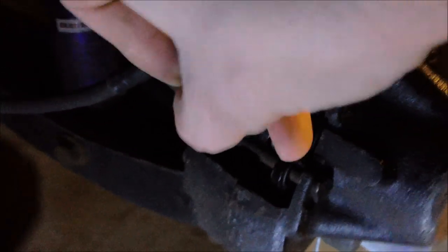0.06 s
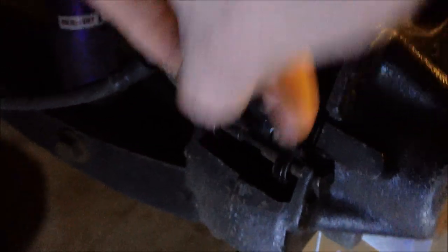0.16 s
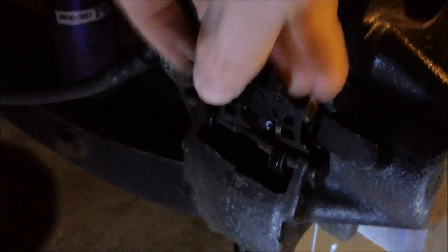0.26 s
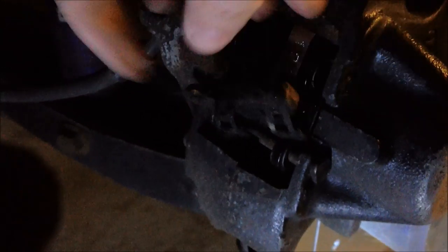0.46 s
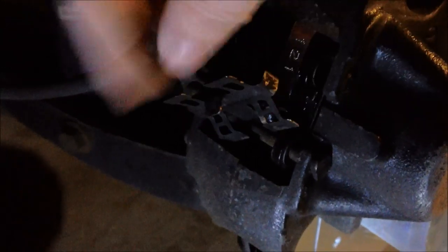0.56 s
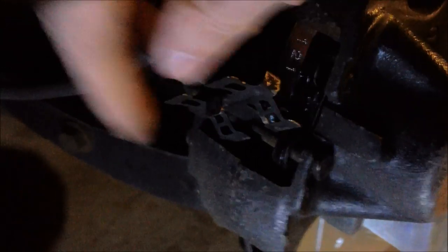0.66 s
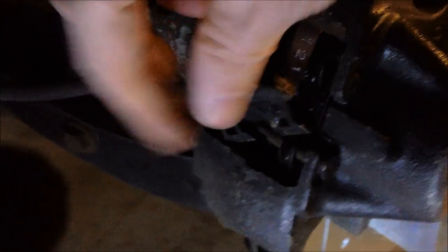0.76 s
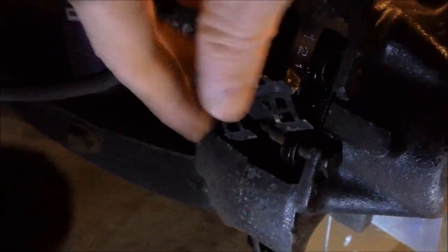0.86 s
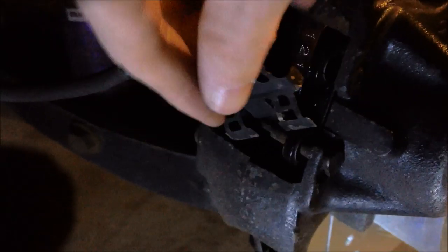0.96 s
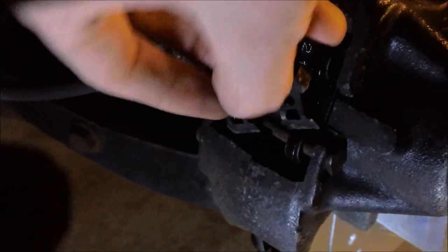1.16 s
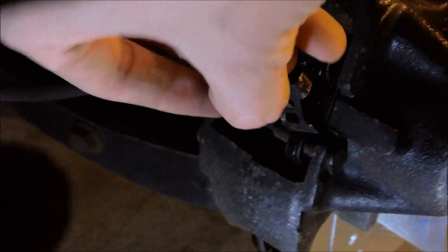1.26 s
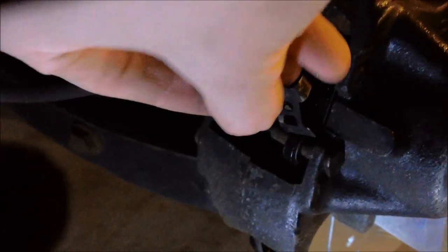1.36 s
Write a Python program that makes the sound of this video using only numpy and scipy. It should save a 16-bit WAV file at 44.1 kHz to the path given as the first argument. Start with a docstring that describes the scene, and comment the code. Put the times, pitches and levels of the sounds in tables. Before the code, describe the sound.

A steel spring clip snaps with one sharp tick, then scrapes and clicks against metal.

```python
"""Spring clip on a brake caliper

Close by in a quiet garage, a hand works a steel spring clip on the pad pin of a brake caliper.
The clip snaps off the pin with one hard, very bright tick, scrapes along, jingles as it comes free
and is set down again. Knocks ring the heavy caliper; in between, the steel rubs and faintly squeaks."""
import sys
import numpy as np
from scipy import signal
from scipy.fft import rfft, irfft
from scipy.io import wavfile
from scipy.ndimage import uniform_filter1d

SR = 44100
rng = np.random.default_rng(int(sys.argv[2]) if len(sys.argv) > 2 else 0)


def transcribe(u):
    """Save the signal u as a 16-bit wav file named by the first command-line argument.

    u: samples, shape (n,) or (channels, n), limited to [-1, 1]; the rate is SR.
    q: integer samples, one column per channel.
    """
    v = np.clip(np.atleast_2d(u).T, -1, 1)
    q = np.round(v * 32767).astype(np.int16)
    wavfile.write(sys.argv[1], SR, q)


N = 61739
TIME = np.arange(N) / SR
FREQS = np.maximum(np.fft.rfftfreq(N, 1 / SR), 1)

# Still garage air and microphone hiss. Each row: frequency in Hz, relative level in dB.
AIR_COLOUR = [(25, -10.5), (48, -5.5), (60, -6.5), (75, -16), (125, 6), (200, 2), (400, -7.5), (700, -9.5),
              (1200, -13.5), (2000, -13.5), (4000, -13), (9000, -17.5), (13000, -16), (15500, -16)]
RUB_FADER = [(0, -59.5), (.09, -59), (.2, -64.5), (.25, -61.5), (.3, -55.5), (.42, -56.5), (.47, -70),
             (.52, -56.5), (.6, -58), (.68, -63), (.76, -74.5), (.86, -71), (.97, -64.5), (1.06, -72.5),
             (1.12, -62.5), (1.21, -67), (1.3, -68.5), (1.4, -73.5)]
# The tone of the scrape. Each row: frequency in Hz, relative level in dB.
RUB_COLOUR = [(100, -27), (200, 0), (450, 1), (680, -2), (1000, 2.5), (1900, -3.5), (2700, -8), (4000, -12),
              (6000, -18.5), (9000, -22), (12500, -18.5), (15500, -18)]
# Steel singing for a moment. Each row: start in seconds, length in seconds, pitch in Hz, level in dB.
SQUEAKS = [(0.037, 0.021, 1220, -75), (0.364, 0.025, 11200, -56.5), (0.373, 0.039, 11800, -64.5),
           (0.401, 0.038, 874, -56.5), (0.496, 0.027, 479, -56.5), (.884, 0.0084, 1040, -44.5),
           (1.085, 0.011, 12900, -62.5), (1.086, 0.024, 14300, -62.5), (1.087, 0.045, 1005, -61.5)]
# Steel touching steel. Each row: start in seconds, levels of thud, clank, ring and sparkle in dB,
# chatter time in seconds.
CONTACTS = [ (0.064, -65, -54.5, -62.5, -62, 0.004), (0.136, -69, -58, -71, -68, 0.0026),
            (0.2408, -47, -38, -39, -26.5, 0.00071), (0.336, -68, -59, -82, -57.5, 0.0032),
            (.372, -70, -60, -65, -57.5, 0.0047), (0.41, -68.5, -61, -70, -66.5, 0.0048),
            (0.499, -64, -61, -75, -67.5, 0.0091), (0.5377, -57, -70, -58.5, -52.5, .0005),
            (0.565, -53.5, -49.5, -64, -52, 0.00063), (0.581, -70, -60, -61, -57, 0.0013),
            (0.59, -66.5, -57.5, -51, -51, 0.021), (0.871, -64, -64.5, -66, -68, 0.0025),
            (0.884, -53.5, -51, -65, -58, 0.0023), (0.892, -50, -50.5, -46, -50, 0.0012),
            (1.089, -67, -78.5, -84, -68, 0.0044), (1.118, -65.5, -61, -77, -81, 0.0057),
            (1.176, -68, -60.5, -66.5, -61.5, 0.001), (1.191, -73, -60, -85.5, -64.5, 0.0028),
            (1.23, -66.5, -74, -73, -64, .003), (1.265, -76.5, -64.5, -76, -78, 0.0023)]
# The thud, clank, ring and sparkle bands. Each row: low and high edge in Hz, 60 dB decay time in
# seconds, garage echo send in dB.
CONTACT_BANDS = [(171, 650, .07, -21), (881, 2050, .08, -40), (2564, 7000, 0.057, -17.5),
                 (9700, 17100, 0.04, -24.5)]
# The crowded modes of the whole assembly. Each row: frequency in Hz, relative level in dB.
ASSEMBLY_COLOUR = [(200, -7), (450, 2.5), (700, -6.5), (1100, -5.5), (1450, 5), (2000, 6), (2550, 7),
                   (3250, 3.5), (4400, 8.5), (5300, -1), (6400, 1.5), (7500, 5), (10000, 5.5), (12500, 10),
                   (13400, 6.5), (15000, 3)]
# Knocks that leave the parts ringing. Each row: start in seconds, place struck, then the force in dB
KNOCKS = [(.2415, "pin", -42, -87, -51.5), (.503, "pad", -56, -64.5, -76),
          (.5635, "pin", -55, -65.5, -58.5), (.591, "pin", -64, -47, -73), (0.605, "pad", -48.5, -60, -59),
          (.8912, "rim", -43, -63, -40.5), (1.188, "rim", -59, -89, -71)]
# Where a knock can land: pin, pad or rim.
PLACES = ["pin", "pad", "rim"]
# The tones of caliper and pad. Each row: pitch in Hz, 60 dB decay time in seconds, then the gain in dB
# when struck at the pin, at the pad and at the rim.
CALIPER_MODES = [(895, .43, -6, 0, -10), (1012, .1, -22, -18, -5), (1080, .2, -22, -14, -12),
                 (1250, .22, -15, -15, -1), (1405, .14, 0, -17, -11), (1785, .1, -1, -20, -1),
                 (2046, .2, -6, -16, -16), (3228, .12, -4, -16, -8), (3822, .18, -13, -25, -22)]
ARM_MODES = [(3100, -5, .12), (3230, -2, .13), (4350, 2, .11), (6896, -9, .15), (7803, 0, .09),
             (8371, -1, .15), (9242, 0, .09), (9658, -11, .15), (10544, -6, .16), (11312, -2, .16),
             (11640, -1, .15), (12385, -3, .22), (12760, -7, .16), (15222, -3, .13)]
SEAT_MODES = [(4330, -4, .04), (4470, -1, .045), (6896, -5, .06), (10600, -3, .075), (10930, -12, .1),
              (11680, -8, .07), (12410, -3, .055)]
# The tick, choked by the fingers. Each row: pitch in Hz, level in dB, 60 dB decay time in seconds.
SNAP_MODES = [(161.4, -47, .01), (1750, -46.5, .012), (3300, -31, 0.0088), (4180, -24.5, .007),
              (6350, -31, 0.0081), (9900, -49, .004), (11600, -22.5, .004), (12300, -15, 0.0037),
              (13700, -7, 0.009), (14100, -21, 0.0071), (15000, -21.5, .004)]

AIR_DB = -68
RUB_SLIPS_PER_S, SLIP_SPREAD_DB, RUB_HUM_DB = 2500, 1, -43.5
SQUEAK_WAVER_SHARE, WAVER_S = 0.03, 0.0006
GARAGE_T60_S, CONTACT_RISE_S = 0.32, 0.000521
SNAP_S, BOUNCE_AFTER_S, BOUNCE_DB = 0.2407, 0.001134, -9
LOW_CUT_HZ, TREBLE_EDGE_HZ, CUTOFF_HZ = 70, 15400, 16860


def from_db(db):
    """Decibels to gain."""
    return 10 ** (np.asarray(db) / 20)


def rms_one(x):
    """Scale to unit power."""
    return x / np.sqrt(np.mean(x ** 2) + 1e-20)


def coloured(x, colour):
    """EQ a steady sound with a colour curve and bring it to unit power."""
    hz, db = np.transpose(colour)
    eq = from_db(np.interp(np.log(FREQS), np.log(hz), db))
    return rms_one(irfft(rfft(x) * eq, N))


def clicks(times, db):
    """One impulse of force for each knock."""
    force = np.zeros(N)
    np.add.at(force, np.round(np.asarray(times) * SR).astype(int), from_db(db))
    return force


def ring(force, hz, t60):
    """One mode: a unit click starts a dying tone of height 1, with no rumble under it."""
    radius, angle = from_db(-60 / (t60 * SR)), 2 * np.pi * hz / SR
    return signal.lfilter([.5, 0, -.5], [1, -2 * radius * np.cos(angle), radius ** 2], force + 1e-18)


def body(force, modes):
    """All the modes of one part under one force, in alternating polarity."""
    return sum((-1) ** k * from_db(db) * ring(force, hz, t60) for k, (hz, db, t60) in enumerate(modes))


def dying(age, t60):
    """Hold at 1 until age zero, then fall 60 dB every t60 seconds."""
    return np.exp(-np.log(1000) * np.maximum(age, 0) / t60)


def garage_air():
    """The bed: soft, steady room tone and hiss."""
    return from_db(AIR_DB) * coloured(rng.standard_normal(N), AIR_COLOUR)


def rubbing():
    """Dense tiny slips of steel on the rough iron rim make a scrape and keep the caliper humming."""
    slip_db = SLIP_SPREAD_DB * np.minimum(rng.exponential(1, N), 4)
    sizes = from_db(slip_db) * rng.choice([-1, 1], N)
    slips = sizes * (rng.random(N) < RUB_SLIPS_PER_S / SR)
    fader = from_db(np.interp(TIME, *np.transpose(RUB_FADER)))
    scrape = coloured(slips, RUB_COLOUR) * fader
    rim_modes = [(hz, rim_db, t60) for hz, t60, _, _, rim_db in CALIPER_MODES]
    return scrape + from_db(RUB_HUM_DB) * body(scrape, rim_modes)


def squeaks():
    """Steel sticks and slips, singing tiny tones of unsteady pitch that swell and fade."""
    out = np.zeros(N)
    for start, length, hz, db in SQUEAKS:
        waver = rms_one(uniform_filter1d(rng.standard_normal(N), int(WAVER_S * SR)))
        pitch = hz * (1 + SQUEAK_WAVER_SHARE * waver)
        tone = rms_one(np.sin(2 * np.pi * np.cumsum(pitch) / SR))
        swell = np.sin(np.pi * np.clip((TIME - start) / length, 0, 1))
        out += from_db(db) * tone * swell
    return out


def contact_clatter():
    """Each touch chatters; the assembly's crowded, damped modes die fast over a faint garage tail."""
    out = np.zeros(N)
    for k, (low, high, t60, echo_db) in enumerate(CONTACT_BANDS):
        power = np.zeros(N)
        for start, *levels_db, chatter_s in CONTACTS:
            age = TIME - start
            attack = np.clip(age / CONTACT_RISE_S, 0, 1)
            direct = dying(age - chatter_s, t60)
            tail = from_db(echo_db) * dying(age, GARAGE_T60_S)
            power += (from_db(levels_db[k]) * attack * (direct + tail)) ** 2
        band = signal.butter(3, [low, high], "band", fs=SR, output="sos")
        noise = signal.sosfilt(band, rng.standard_normal(N))
        out += np.sqrt(power) * coloured(noise, ASSEMBLY_COLOUR)
    return out


def ringing_parts():
    """Knocks draw clear tones from clip and caliper; the place struck sets the caliper's mix of modes."""
    starts, places, caliper_db, arms_db, seat_db = zip(*KNOCKS)
    out = body(clicks(starts, arms_db), ARM_MODES) + body(clicks(starts, seat_db), SEAT_MODES)
    for k, (hz, t60, *place_db) in enumerate(CALIPER_MODES):
        strength_db = np.add(caliper_db, [place_db[PLACES.index(place)] for place in places])
        out += (-1) ** k * ring(clicks(starts, strength_db), hz, t60)
    return out


def clip_snap():
    """The hero tick: the spring slips, hits its stop and bounces once, about a millisecond later."""
    force = clicks([SNAP_S, SNAP_S + BOUNCE_AFTER_S], [0, BOUNCE_DB])
    return sum(from_db(db) * ring(force, hz, t60) for hz, db, t60 in SNAP_MODES)


def scene():
    """Mono mix of the room bed, the handling noises and the snap on top."""
    mix = garage_air() + contact_clatter() + squeaks() + rubbing() + ringing_parts() + clip_snap()
    return mix[None]


def record(dry):
    """The microphone sheds deep bass and rolls off steeply at the very top, ending in a hard cut."""
    low_cut = signal.butter(2, LOW_CUT_HZ, "high", fs=SR, output="sos")
    thinned = signal.sosfilt(low_cut, dry)
    roll_off = 1 / np.sqrt(1 + (FREQS / TREBLE_EDGE_HZ) ** 160)
    return irfft(rfft(thinned) * roll_off * (FREQS < CUTOFF_HZ), N)


dry = scene()
out = record(dry)
transcribe(out)
```